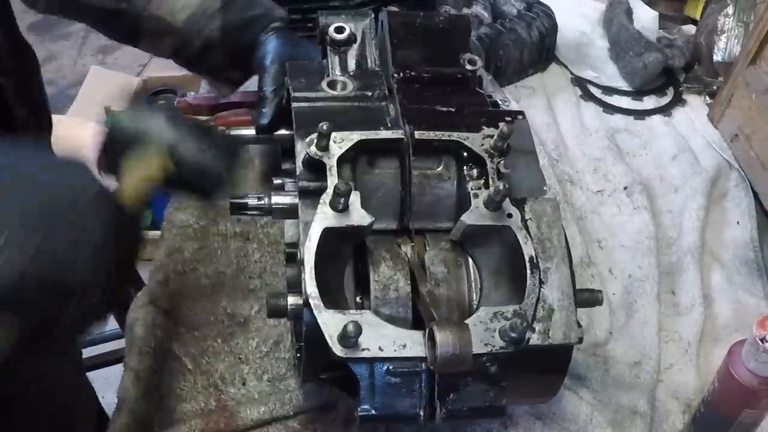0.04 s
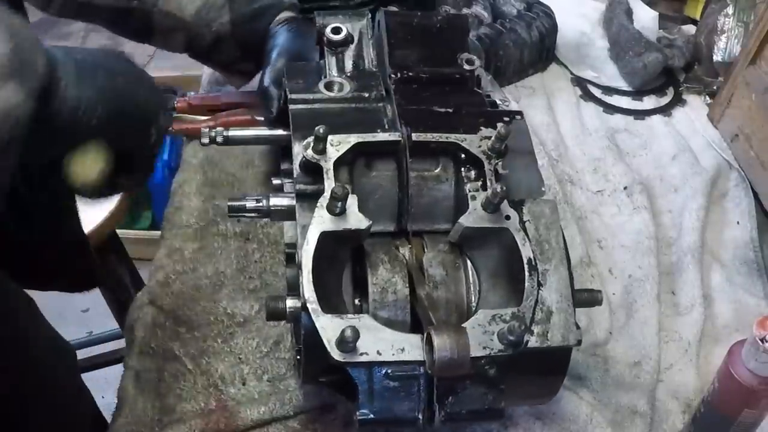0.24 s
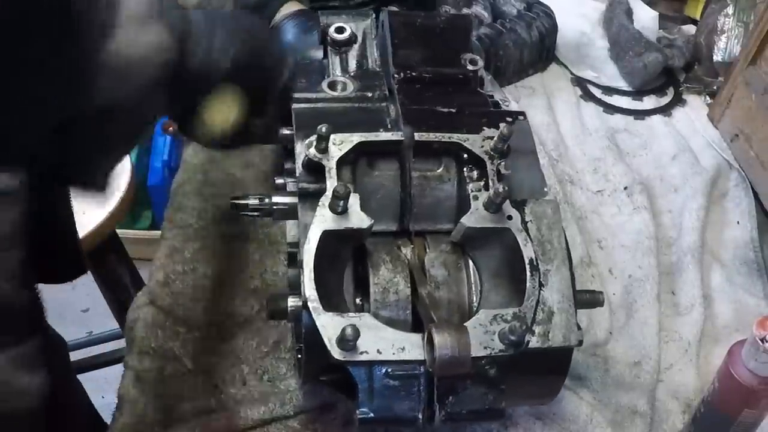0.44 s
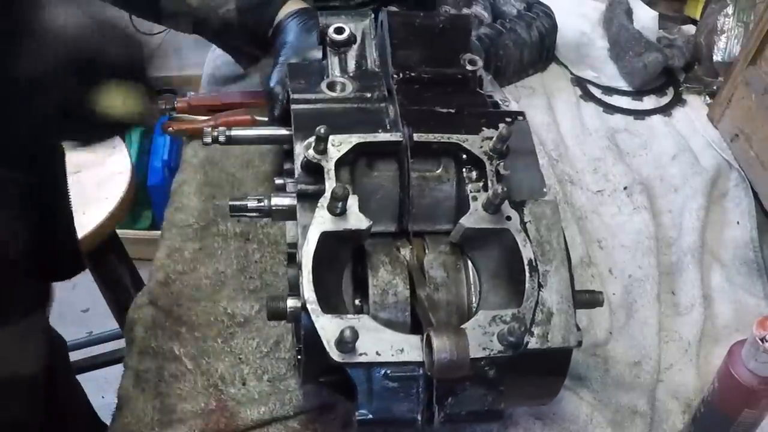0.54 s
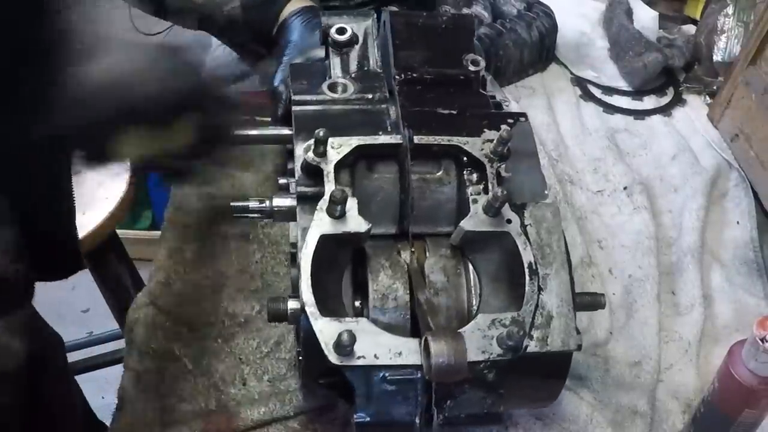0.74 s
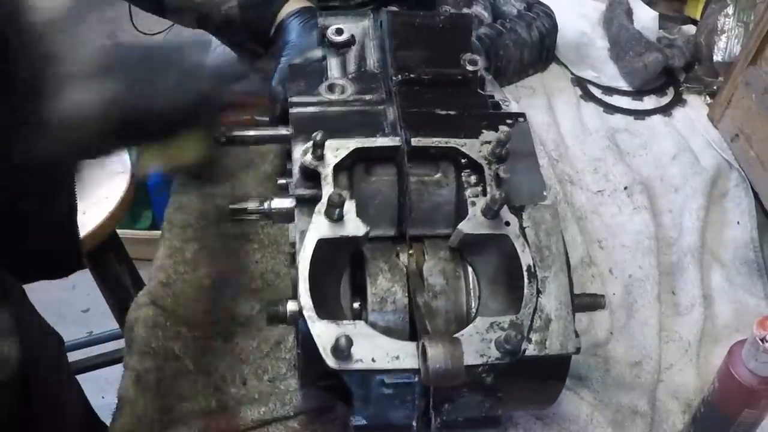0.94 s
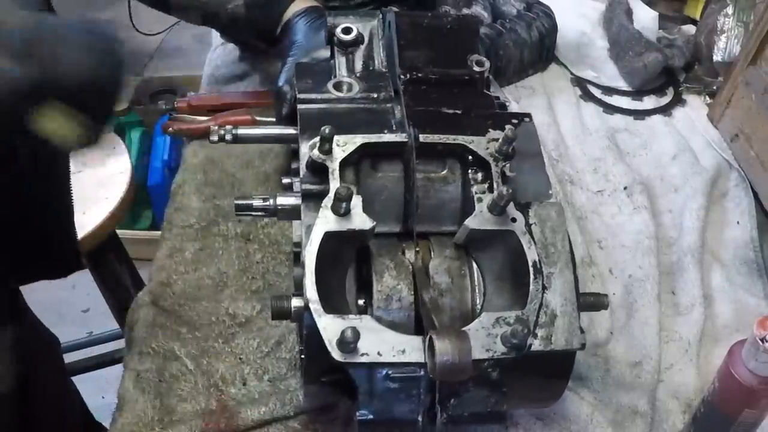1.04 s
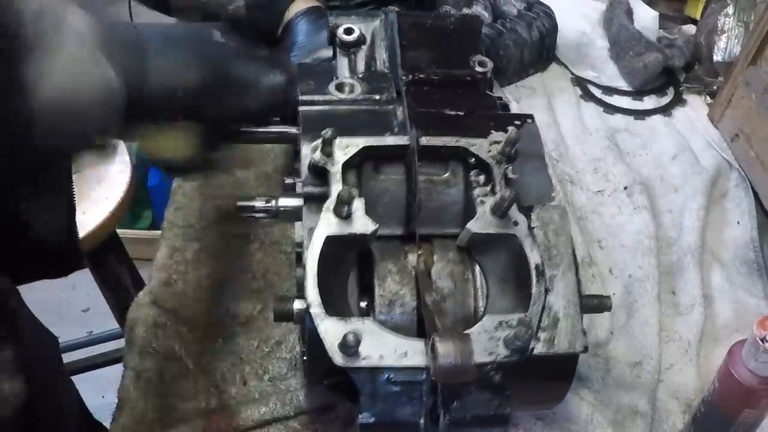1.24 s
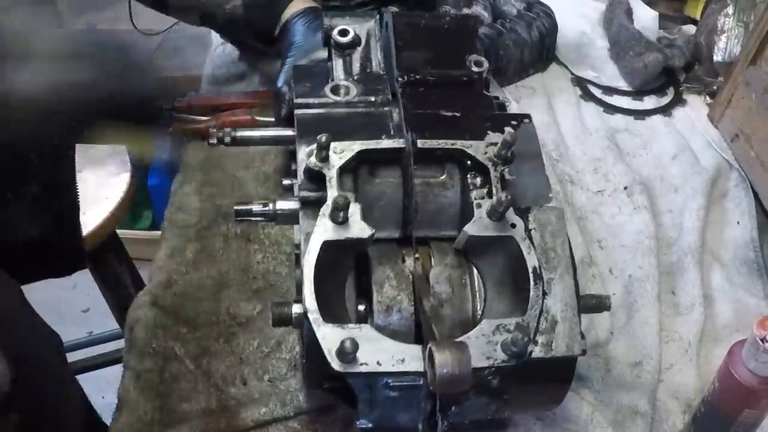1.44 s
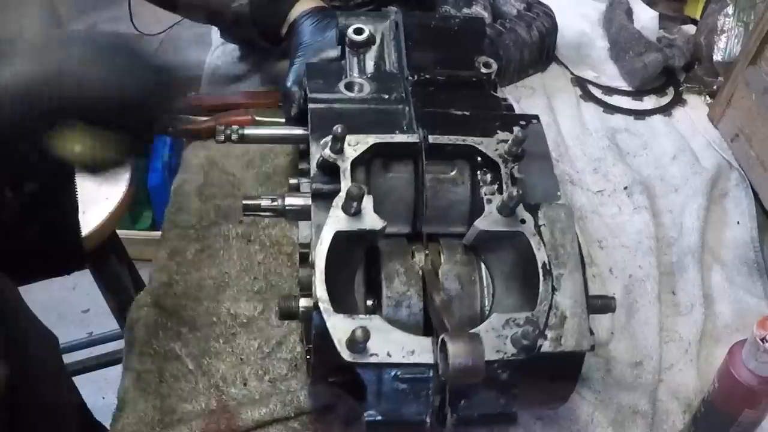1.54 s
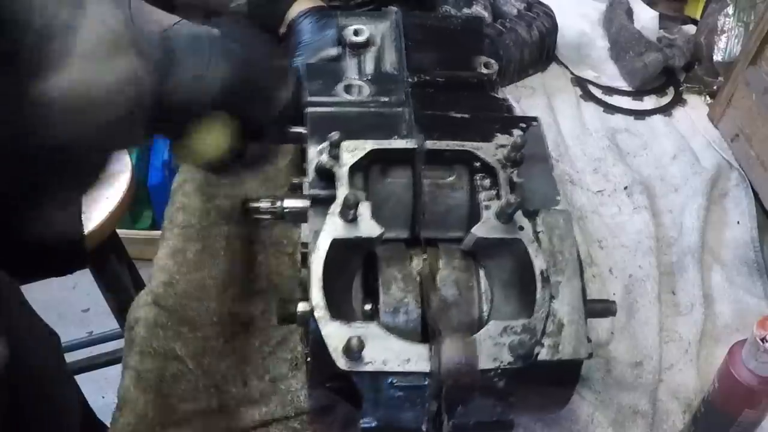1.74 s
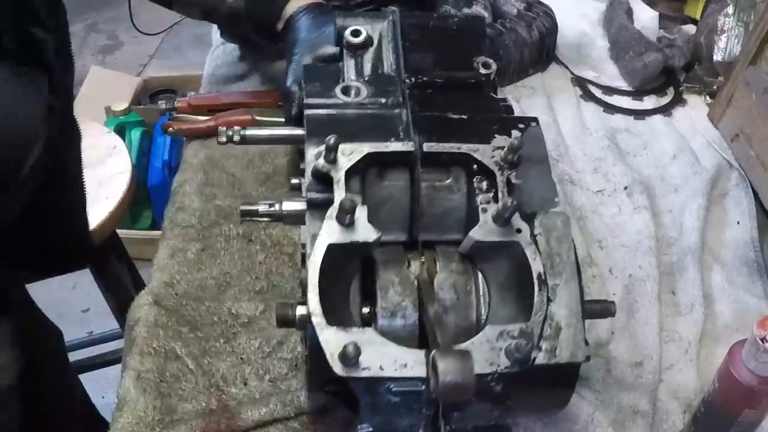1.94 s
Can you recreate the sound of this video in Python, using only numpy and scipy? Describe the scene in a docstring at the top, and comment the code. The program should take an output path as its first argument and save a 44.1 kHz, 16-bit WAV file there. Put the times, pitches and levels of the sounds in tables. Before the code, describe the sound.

Mallet blows on an aluminium engine casing, close and overloaded. Low rumble and soft hiss until 0.4 s, then solid knocks at about 0.40, 0.65, 0.92, 1.18, 1.43 and 1.70 s. Each cracks sharply, thumps the bench and rings briefly; the fifth has a brighter shaft ring. A loose steel part clinks 0.04-0.1 s after each. Short workshop reverberation; background ducks, then slowly returns.

```python
"""Over rumble and hiss (coloured noise), a mallet knocks six times on an aluminium engine casing on a workbench.
Each blow starts with noise bursts and the decaying modes of casing and shaft, then a shove and modes of the bench.
Next comes the brief reverberation of the small workshop; soon a loose steel part clinks as the casing drops back.
A faint low tone rings on from the first blow; soft bumps of the hand shifting its grip precede the last.
The microphone is close: the blows overload the recorder and push down its gain, which then recovers slowly."""
import sys
import numpy as np
from scipy import signal
from scipy.fft import rfft, irfft
from scipy.io import wavfile
from scipy.ndimage import uniform_filter1d

SR = 44100
rng = np.random.default_rng(int(sys.argv[2]) if len(sys.argv) > 2 else 0)


def persist_wave(psi):
    """Save psi, clipped to +-1, as 16-bit WAV."""
    counts = np.round(np.clip(psi, -1, 1) * 32767).astype(np.int16)
    wavfile.write(sys.argv[1], SR, np.atleast_2d(counts).T)


N = 88200  # samples
STRIKE_SAMPLES = SR // 2  # longest sound of one strike


def amp(db):
    """Level to amplitude: 20 dB is a factor of ten."""
    return 10 ** (np.asarray(db) / 20)


def read(points, hz):
    """Linear interpolation of a spectrum table on a logarithmic frequency axis."""
    f, value = np.transpose(points)
    return np.interp(np.log(hz + 1), np.log(f + 1), value)


def add(mix, s, sound):
    """Superposition: adds a sound to the mix in place, from time s on."""
    part = mix[max(round(s * SR), 0):][:len(sound)]
    part += sound[:len(part)]


def noise(points, size):
    """Spectral shaping: white noise filtered to a colour, then scaled to unit power."""
    hz = np.fft.rfftfreq(size, 1 / SR)
    spectrum = rfft(rng.standard_normal(size)) * amp(read(points, hz))
    x = irfft(spectrum, size)
    return x / x.std()


def fade(x, t60_of, hold_s, count=12):
    """Frequency-dependent damping: after a hold, each band decays exponentially with its own T60."""
    age = np.maximum(np.arange(len(x)) / SR - hold_s, 0)
    centres = np.geomspace(50, 16000, count)
    hz = np.fft.rfftfreq(len(x), 1 / SR)
    spectrum = rfft(x)
    out = np.zeros(len(x))
    # overlapping triangular bands that sum to one
    for f, share in zip(centres, np.eye(count)):
        band = irfft(spectrum * read(np.c_[centres, share], hz), len(x))
        out += band * amp(-60 * age / t60_of(f))
    return out


DETUNE = 0.0053  # standard deviation of a mode's frequency, as a fraction


def ring(modes, rise_s):
    """Modal superposition: damped sines of alternating sign, slightly detuned at each strike."""
    t = np.arange(STRIKE_SAMPLES) / SR
    out = np.zeros(STRIKE_SAMPLES)
    for k, (hz, db, t60) in enumerate(modes):
        detuned_hz = hz * (1 + DETUNE * rng.standard_normal())
        out += (-1) ** k * amp(db - 60 * t / t60) * np.sin(2 * np.pi * detuned_hz * t)
    return out * np.minimum(t / rise_s, 1)


def cluster(modes, rise_s, count):
    """Beating: each mode splits into closely tuned partners that interfere."""
    return sum(ring(modes, rise_s) for _ in range(count)) / count


T60_SLOPE = 0.45  # T60 falls as frequency to this power


def burst(colour, rise_s, hold_s, t60_s):
    """High modal density: many short modes merge into noise; t60_s holds at 1 kHz, high bands die first."""
    x = fade(noise(colour, STRIKE_SAMPLES), lambda hz: t60_s * (hz / 1000) ** -T60_SLOPE, hold_s)
    rise = np.minimum(np.arange(len(x)) / SR / rise_s, 1)
    return x * rise ** 2


BOOST_DB = 15.5  # recorder gain in quiet
AIR_DB, AIR_FADE_S = -22, 0.0071  # level after the quiet gain; fade at both ends

# spectrum of the room tone: f/Hz, relative density/dB
AIR_SPECTRUM = [(3, 15), (9, 32), (15, 43.5), (22, 8.5), (35, 1), (55, 9), (100, -7.5), (250, -11),
                (600, -11), (1200, -16.5), (3000, -23.5), (7000, -25.5), (10000, -27.5), (15000, -34)]


def room_tone():
    """Stationary random noise: deep rumble and soft hiss."""
    t = np.arange(N) / SR
    ends = np.minimum(np.minimum(t, t[::-1]) / AIR_FADE_S, 1)
    return amp(AIR_DB - BOOST_DB) * noise(AIR_SPECTRUM, N) * ends


HUM_HZ, HUM_DB, HUM_FADE_DB_PER_S = 221, -54.5, 6  # RMS level at the start


def low_ring():
    """Exponential decay of one mode: something on the bench rings faintly from the first blow."""
    age = np.maximum(np.arange(N) / SR - BLOW_TABLE[0][0], 0)
    return amp(HUM_DB - HUM_FADE_DB_PER_S * age) * np.sqrt(2) * np.sin(2 * np.pi * HUM_HZ * age)


# spectral envelope of the reverberation, reverberation times: f/Hz, T60/s
ROOM_DECAY = [(60, 0.71), (200, 0.2767), (600, 0.2943), (2000, 0.1368), (7000, 0.1076), (15000, 0.12)]
# colour of the reverberation: f/Hz, relative level/dB
ROOM_SPECTRUM = [(40, -9), (120, -10), (400, -11), (1000, -10.5), (2200, -2), (4300, -2.5), (7000, -2.5),
                 (10000, -5), (15000, 1)]
ROOM_DELAY_S = 0.007


def workshop(x):
    """Diffuse reverberation: convolution with decaying noise, drawn anew for each use."""
    tail = fade(noise(ROOM_SPECTRUM, STRIKE_SAMPLES), lambda hz: read(ROOM_DECAY, hz), 0)
    tail /= np.linalg.norm(tail)  # unit energy
    out = np.zeros(len(x))
    add(out, ROOM_DELAY_S, signal.fftconvolve(x, tail))
    return out


CASING_RISE_S = 0.0024  # also the rise of shaft and hand bumps

# bumps of the hand shifting its grip: t/s, level/dB
GRIP_BUMPS = [(1.640, -45), (1.669, -47)]
# modes of one bump: f/Hz, relative level/dB, T60/s
GRIP_MODES = [(400, -4, 0.029), (485, 5, .05), (640, -5.5, .04)]


def hand():
    """Modal response to a soft impact: faint bumps before the last blow."""
    out = np.zeros(N)
    for s, db in GRIP_BUMPS:
        add(out, s, amp(db) * ring(GRIP_MODES, CASING_RISE_S))
    return out


TICK_DB, TICK_RISE_S, TICK_HOLD_S, TICK_T60_S = -25, 0.0007, 0.0048, 0.025
LOOSE_RISE_S = 0.001

# clinks: t/s, level/dB, level of the tick within the clink/dB
CLINK_TABLE = [(0.4378, -2.5, -0.5), (0.7084, 1, -1), (0.7301, -15.5, 5.5), (0.769, -38, -9),
               (0.9711, -1, 0), (0.9892, -20.5, -2), (1.2358, 0.5, -0.5), (1.2596, -20.5, 3),
               (1.270, -21, 3.5), (1.333, -34.5, -8.5), (1.4865, -3, -3), (1.591, -44.5, 8),
               (1.7967, 2.5, -1), (1.8299, -5, 1), (1.8468, -14.5, 4.5)]
# spectrum of the tick: f/Hz, relative density/dB
TICK_SPECTRUM = [(200, -9.5), (1400, 9), (2150, -6), (2750, 8.5), (3400, -7.5), (4700, -4.5), (6700, -19),
                 (7900, -9.5), (9300, -26.5), (15000, -36)]
# modes of the loose part: f/Hz, relative level/dB, T60/s
LOOSE_MODES = [(1258, -23.5, 0.021), (1529, -27.5, 0.0093), (1705, -32, 0.086), (1980, -35, 0.12),
               (2580, -24, 0.055), (2750, -29.5, .02), (2819, -22, 0.049), (4556, -35.5, 0.067),
               (5990, -30.5, 0.04), (7400, -39, 0.056), (10380, -41.5, 0.025)]


def loose_part():
    """Repeated impact: a loose steel part lands and bounces after the blows, ticking and ringing."""
    out = np.zeros(N)
    for s, db, tick_db in CLINK_TABLE:
        tick = amp(TICK_DB + tick_db) * burst(TICK_SPECTRUM, TICK_RISE_S, TICK_HOLD_S, TICK_T60_S)
        add(out, s, amp(db) * (tick + cluster(LOOSE_MODES, LOOSE_RISE_S, count=2)))
    return out


PUSH_DB, PUSH_HZ, PUSH_DELAY_S = -2, 139, 0.00665  # spectral peak and time of the main swing


def push():
    """Impulsive displacement: the casing shoves the bench once and springs back, as a Ricker wavelet."""
    t = np.arange(SR // 10) / SR
    u = (np.pi * PUSH_HZ * (t - PUSH_DELAY_S)) ** 2
    return amp(PUSH_DB) * (2 * u - 1) * np.exp(-u)


# modes of the bench under the casing: f/Hz, relative level/dB, T60/s
BENCH_MODES = [(62, -16, .13), (96, -7, .135), (120, -13, .11), (145, -12, .1), (184, -6, .095),
               (255, -10, .085), (312, -17, .06)]
# low modes on which the bench rocks: f/Hz, relative level/dB, T60/s
ROCKING_MODES = [(32, -32, 1), (51, -43.5, 0.26), (77, -33, 1)]


def bench():
    """Structure-borne sound: the bench thumps in its own low modes."""
    return ring(BENCH_MODES + ROCKING_MODES, rise_s=0.001)


# modes of the steel shaft: f/Hz, relative level/dB, T60/s
SHAFT_MODES = [(2826, -39, .22), (7060, -33, .2), (7220, -19, .05)]


def shaft():
    """Beating of near-degenerate modes: the steel shaft rings high."""
    return cluster(SHAFT_MODES, CASING_RISE_S, count=4)


CASING_DB, WALL_T60_S = 3, 0.05

# modes of the casing: f/Hz, relative level/dB, T60/s
CASING_MODES = [(397.4, -5, 0.023), (463.6, -10, .075), (561.2, -5.5, 0.047), (671.6, -14.5, 0.076),
                (831, -7, 0.043), (1045, -14.5, .05), (1143, -5, 0.046), (1262, -18.5, 0.051),
                (1532, -20.5, 0.075), (1712, -25.5, 0.018), (1835, -13, 0.046), (2280, -24, .05),
                (2340, -26, 0.045), (2820, -23.5, 0.013), (3224, -26.5, 0.053)]


def casing(wall_hz, wall_db):
    """Modal vibration: the casing rings, with one more mode for the wall that is struck."""
    return amp(CASING_DB) * ring(CASING_MODES + [(wall_hz, wall_db, WALL_T60_S)], CASING_RISE_S)


CRACK_DB, CRACK_RISE_S, CRACK_T60_S = -5.5, 0.0017, 0.077

# spectrum of the casing's many short modes: f/Hz, relative density/dB
CRACK_SPECTRUM = [(60, -4.5), (300, 0.5), (1100, -4), (1600, -9.5), (3000, -10), (4300, -19), (5900, -16),
                  (7500, -18), (9500, -28), (12000, -26.5), (16000, -44.5)]


def crack(level_db, hold_s):
    """Statistical modal overlap: the casing's many short modes crack as one."""
    return amp(CRACK_DB + level_db) * burst(CRACK_SPECTRUM, CRACK_RISE_S, hold_s, CRACK_T60_S)


CONTACT_DB, CONTACT_HOLD_S, CONTACT_T60_S = -16.5, 0.0031, 0.0027

# spectrum of the mallet face's first contact: f/Hz, relative density/dB
CONTACT_SPECTRUM = [(300, -6), (1200, -5.5), (3000, -1), (4400, -11), (5900, 12.5), (6600, 1.5),
                    (8500, -20.5), (11500, -22.5), (16000, -19.5)]


def contact():
    """Impact excitation: a very short noise burst as the mallet face first touches."""
    return amp(CONTACT_DB) * burst(CONTACT_SPECTRUM, CRACK_RISE_S, CONTACT_HOLD_S, CONTACT_T60_S)


BENCH_DELAY_S, ROOM_DB = 0.0022, -12

# mallet blows: t/s, level/dB, bench thump level/dB, crack level/dB, crack hold t/s,
# struck wall f/Hz, wall level/dB, shaft level/dB, room level/dB (all parts relative)
BLOW_TABLE = [(0.3972, 0.5, 1, 1.5, 0.0019, 1130, -14, -10, -6),
              (0.6504, -1.5, 1, -2, 0.0036, 1264, -16, -20, 0),
              (0.9193, 0.5, -1.5, -1.5, 0.0018, 1220, -9, -27, -1),
              (1.1806, -1, 1, 0.5, 0.0027, 1300, -5.5, -12.5, 0),
              (1.4329, -1.5, -4.5, 1, 0.0079, 1208, -10, 6, -1),
              (1.704, -0.5, 0, 1, 0.0016, 1119, -0.5, -11, -1.5)]


def mallet():
    """Transmission of an impact: each blow excites casing and shaft, then the bench and the room."""
    out = np.zeros(N)
    for s, db, thump_db, crack_db, crack_s, wall_hz, wall_db, shaft_db, room_db in BLOW_TABLE:
        blow = contact() + crack(crack_db, crack_s)
        blow += casing(wall_hz, wall_db)
        blow += amp(shaft_db) * shaft()
        add(blow, 0, amp(thump_db) * push())
        add(blow, BENCH_DELAY_S, amp(thump_db) * bench())
        reverberation = amp(ROOM_DB + room_db) * workshop(blow)
        add(out, s, amp(db) * (blow + reverberation))
    return out


CLINK_ROOM_DB = -12


def scene():
    """Linear superposition of all sources; the clinks reverberate too."""
    clinks = loose_part()
    background = room_tone() + low_ring() + hand()
    return (background + clinks + amp(CLINK_ROOM_DB) * workshop(clinks) + mallet())[None]


TARGET_DB, RECOVER_DB_PER_S, LOOK_AHEAD_S = -7, 6, 0.013
CEILING, KNEE = 0.98, 5  # saturation amplitude and sharpness
EDGE_HZ = 15500  # band limit


def record(dry):
    """Dynamic compression: loud sound lowers the gain, which recovers slowly; saturation; low-pass."""
    # power averaged over a centred window, so the gain moves ahead of a blow
    power = uniform_filter1d(dry[0] ** 2, 2 * round(LOOK_AHEAD_S * SR) + 1)
    level_db = 10 * np.log10(abs(power) + 1e-12)
    # the held peak level falls at a constant rate
    fall_db = np.arange(N) / SR * RECOVER_DB_PER_S
    held_db = np.maximum.accumulate(level_db + fall_db) - fall_db
    gain_db = np.clip(TARGET_DB - held_db, 0, BOOST_DB)
    x = dry * amp(uniform_filter1d(gain_db, size=128))
    x = x / (1 + abs(x / CEILING) ** KNEE) ** (1 / KNEE)
    low_pass = signal.firwin(255, EDGE_HZ, window=("kaiser", 8), fs=SR)
    return signal.oaconvolve(x, low_pass[None], "same")


dry = scene()
out = record(dry)
persist_wave(out)
```